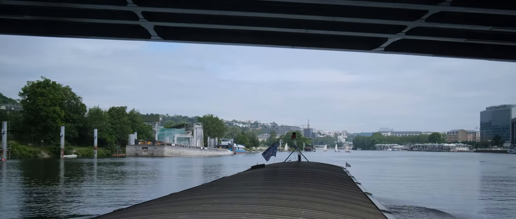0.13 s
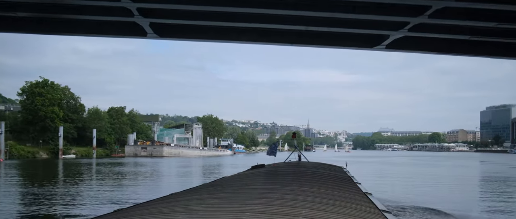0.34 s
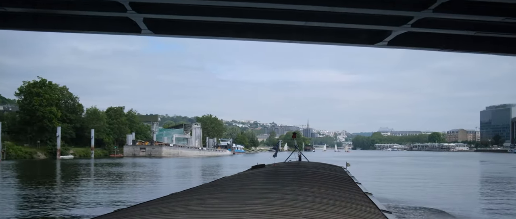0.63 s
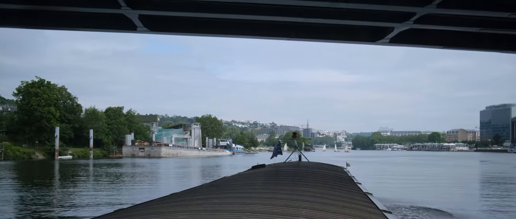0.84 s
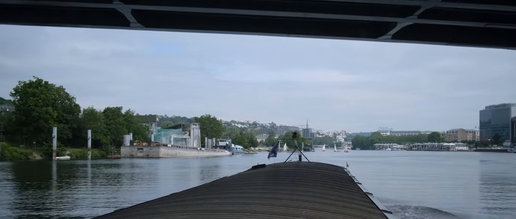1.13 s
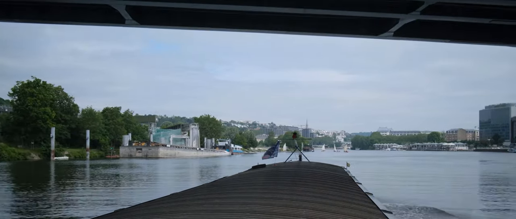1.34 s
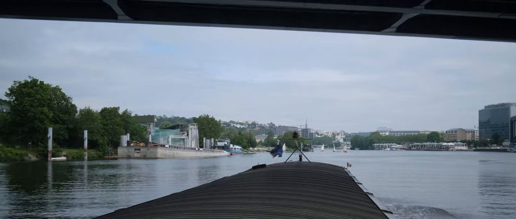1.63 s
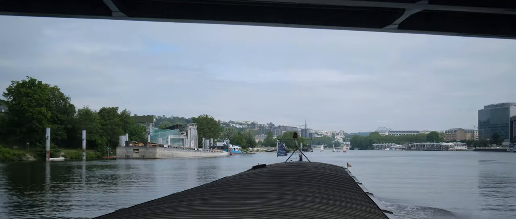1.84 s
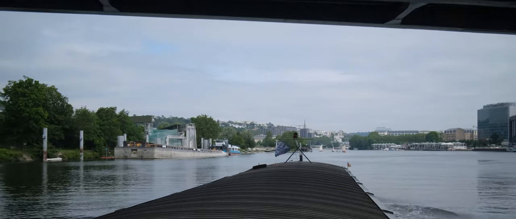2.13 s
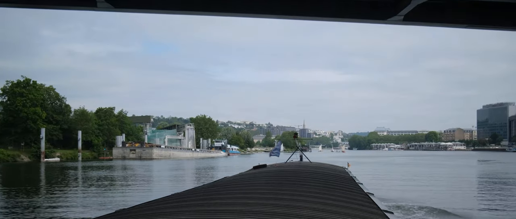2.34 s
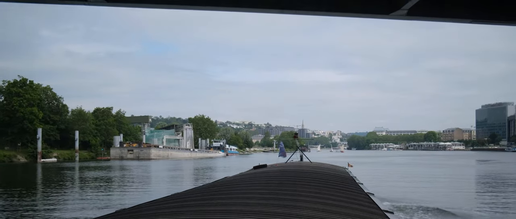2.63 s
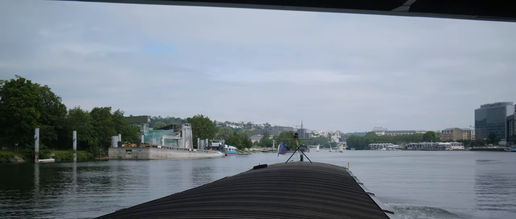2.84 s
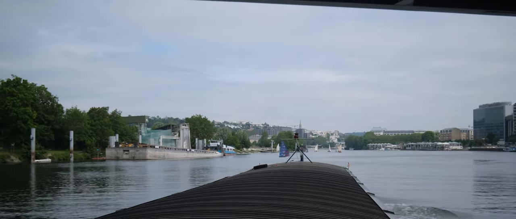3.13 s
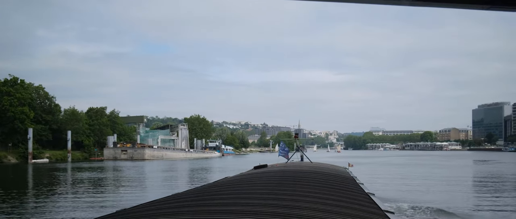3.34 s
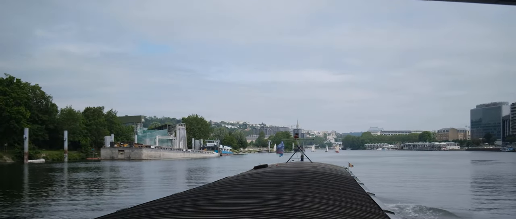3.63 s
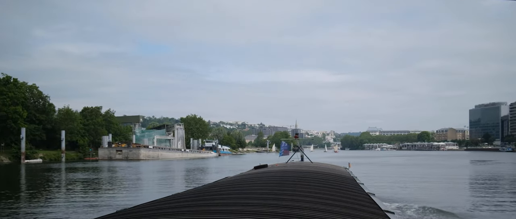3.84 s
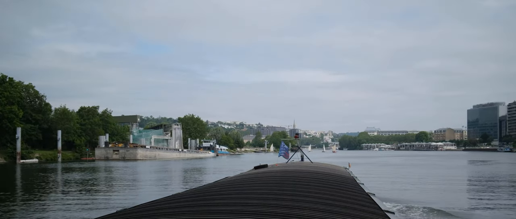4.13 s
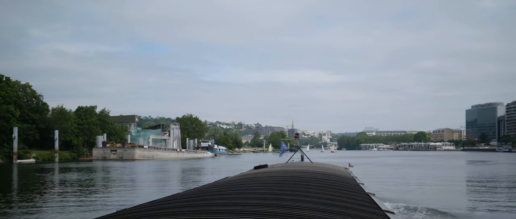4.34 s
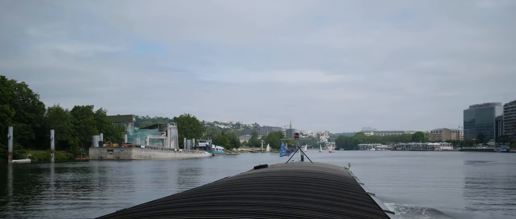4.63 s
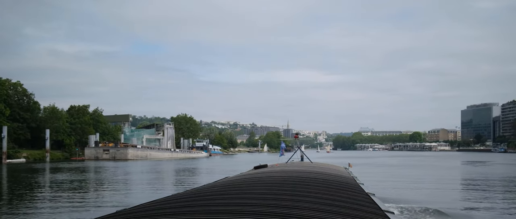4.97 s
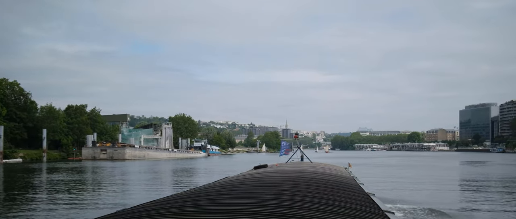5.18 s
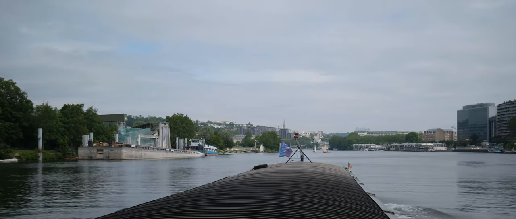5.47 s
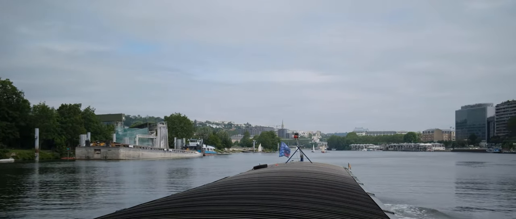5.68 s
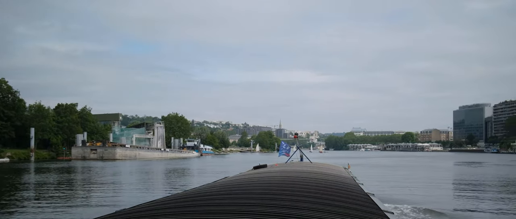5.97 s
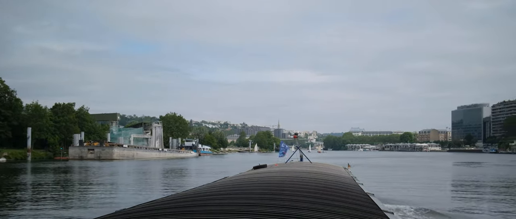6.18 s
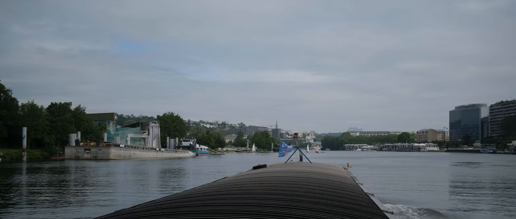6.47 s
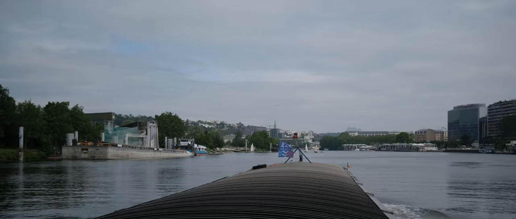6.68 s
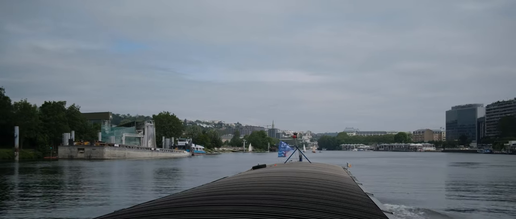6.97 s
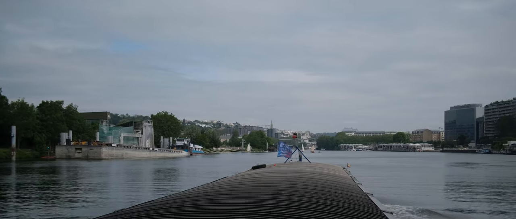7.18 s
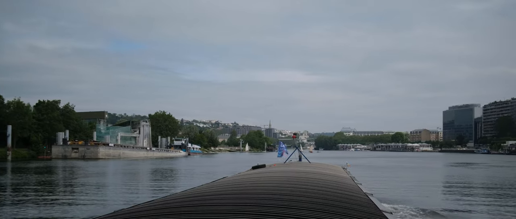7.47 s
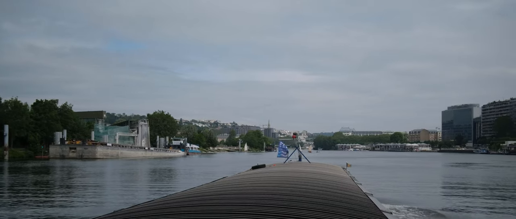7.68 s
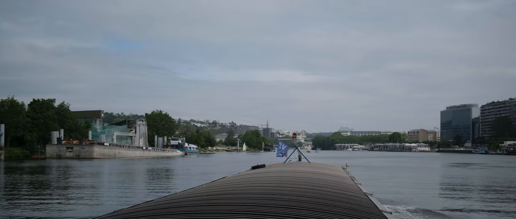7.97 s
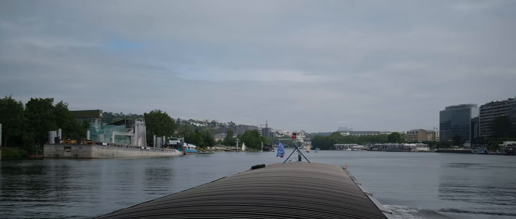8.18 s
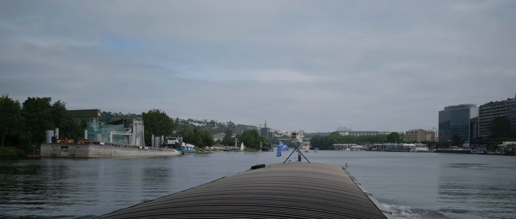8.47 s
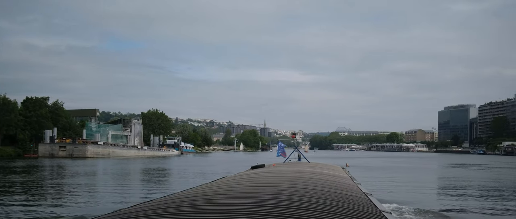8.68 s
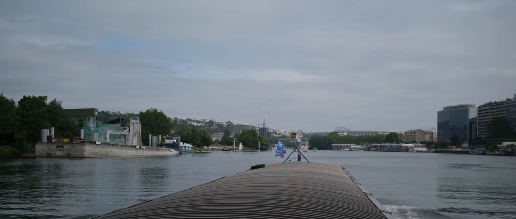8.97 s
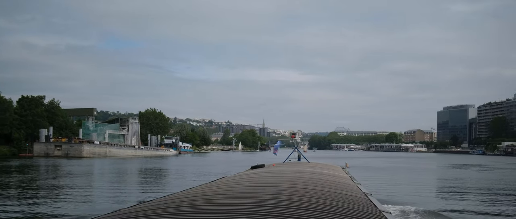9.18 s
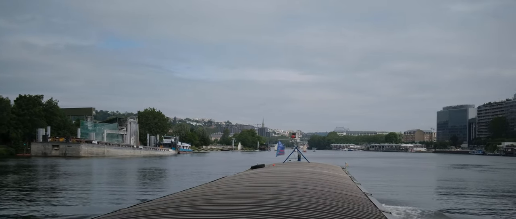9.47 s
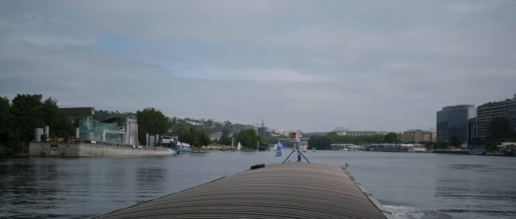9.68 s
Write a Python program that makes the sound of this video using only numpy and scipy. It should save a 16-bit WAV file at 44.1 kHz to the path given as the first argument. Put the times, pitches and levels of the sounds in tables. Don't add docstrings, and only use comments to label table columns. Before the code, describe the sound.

A barge's big diesel runs at constant speed, heard close from the roof outdoors. A dense low drone swells and sinks about every two seconds, with fine mechanical hiss and clatter. Passing under a bridge darkens it briefly, then it opens up. A loose metal part ticks rapidly in spells, and wash splashes softly early and late. The microphone distorts slightly on the deep pulses.

```python
import sys
import numpy as np
from scipy import signal
from scipy.fft import rfft, irfft, next_fast_len
from scipy.io import wavfile
from scipy.ndimage import map_coordinates

SR = 44100
rng = np.random.default_rng(int(sys.argv[2]) if len(sys.argv) > 2 else 0)


def ratio_of_db(decibels):
    return 10 ** (np.asarray(decibels, float) / 20)


def log_audio(samples):
    frames = np.atleast_2d(samples).T
    limited = np.clip(frames, -1, 1)
    pcm = np.round(limited * 32767).astype(np.int16)
    wavfile.write(sys.argv[1], SR, pcm)


N = 432621

# time in seconds, firing rate in Hz, firing order in dB, its octave in dB.
FIRING = [(0.2, 61.08, -12, -12.5), (0.8, 60.98, -13, -12.5), (1.2, 60.74, -13.5, -14.5),
          (1.6, 60.85, -11.5, -14.5), (2.25, 60.76, -11.5, -17.5), (3.0, 61.07, -12, -13.5),
          (3.4, 60.84, -10.5, -17.5), (3.8, 60.58, -11.5, -15.5), (4.4, 60.7, -11, -14),
          (5.2, 60.97, -10.5, -13), (5.6, 60.93, -10, -16), (6.0, 60.97, -10.5, -12.5),
          (6.4, 60.65, -10.5, -17), (6.75, 60.73, -10, -14), (7.3, 60.52, -9.5, -14.5),
          (7.9, 60.72, -10.5, -17.5), (9.1, 60.81, -11, -11), (9.6, 60.72, -10.5, -17.5)]
# time in seconds, open share (0-1).
OPEN_SKY = [(0, .85), (.75, .8), (1.0, .05), (2.5, .08), (3.0, 0.6), (4.05, .5), (4.45, .9), (6.5, 0.98),
            (8.4, 0.93), (9.1, 1.05), (9.81, 1.02)]
BLADE_HZ = 40.0


def unit(x):
    return x / np.sqrt(np.mean(x ** 2) + 1e-20)


def curves(rows):
    s, *cols = np.transpose(rows)
    return [np.interp(np.arange(N) / SR, s, c) for c in cols]


def wobble(knots_per_s):
    coarse = np.arange(0, N + 32, 32)
    knots = rng.standard_normal(int(N * knots_per_s / SR) + 5)
    return np.interp(np.arange(N), coarse, map_coordinates(knots, [coarse * knots_per_s / SR]))


def filtered(x, response):
    m = next_fast_len(N + SR // 2)
    return irfft(rfft(x, m) * response(np.fft.rfftfreq(m, 1 / SR)), m)[..., :N]


def coloured(points):
    hz, db = np.transpose(points)
    gain = lambda f: ratio_of_db(np.interp(np.log(f + 1), np.log(hz), db))
    return unit(filtered(rng.standard_normal(N), gain))


def resonance(f, hz, width_hz):
    return 1j * f * width_hz / (hz * hz - f * f + 1j * f * width_hz)


def load_db(usual_db, db_per_db):
    usual_firing_db = -10.5
    return usual_db + db_per_db * (curves(FIRING)[1] - usual_firing_db)


def open_air_db(shaded_db, gain_db, power, swell_db):
    swells_per_s = 3.1
    return shaded_db + gain_db * np.abs(curves(OPEN_SKY)[0]) ** power + swell_db * wobble(swells_per_s)


def slip(late_s=0.):
    period_s, first_cancel_s = 1.87, 1.38
    return -np.cos(2 * np.pi * (np.arange(N) / SR - first_cancel_s - late_s) / period_s)


def roar():
    # frequency in Hz, density in dB per Hz.
    rumble = [(15, -39.5), (30, -7), (50, 1.5), (70, -7), (120, -5.5), (170, -4.5), (230, -9.5), (400, -17),
              (800, -23.5), (1300, -39.5), (2500, -66.5)]
    return ratio_of_db(load_db(-38, .6) + 14 + 0.21 * wobble(23)) * coloured(rumble)


def splashes():
    # start in seconds, level in dB, t60 in seconds.
    waves = [
        (1.43, -45.5, 3.6),
        (7.41, -46, 2),
        (7.7, -52, .7),
        (4.68, -53, 1.5),
        (8.2, -55, 6),
        (1.26, -56, .4),
    ]
    # frequency in Hz, density in dB per Hz.
    spray = [(600, -30), (1200, -2), (2600, 0), (4500, -7), (7000, -19), (9500, -30), (12000, -45)]
    mist = [(2500, -30), (4000, -3), (6500, 0), (9000, -6), (11000, -25)]  # (Hz, dB per Hz)
    t = np.arange(N) / SR

    def flow(haste):
        total = np.zeros(N)
        for start_s, db, t60_s in waves:
            after_s = np.maximum(t - start_s, 0)
            total += ratio_of_db(db - 60 * haste * after_s / t60_s) * (1 - np.exp(-after_s / .06))
        return total

    lumps = ratio_of_db(1.5 * wobble(45) + 3 * wobble(300))
    body = flow(1) * unit(lumps * coloured(spray))
    return body + ratio_of_db(-9.5) * flow(3.5) * unit(lumps * coloured(mist))


def throb_db():
    share = np.clip(.2 + .06 * np.arange(N) / SR, 0, .9)
    return -27.5 + 10 * np.log10(1 + share ** 2 + 2 * share * slip())


def hull():
    # frequency in Hz, level in dB.
    pump_hums = [(25.6, -47.5), (46.2, -41), (114.8, -30.5), (183.9, -40)]
    t = np.arange(N) / SR
    out = ratio_of_db(throb_db()) * np.cos(2 * np.pi * BLADE_HZ * t - .9 + 0.37 * wobble(1.6))
    for hz, db in pump_hums:
        out += ratio_of_db(db + 0.98 * wobble(1.3)) * np.sin(2 * np.pi * hz * t + 0.4 * wobble(0.97))
    return np.sqrt(2) * out


def looseness(s):
    # start in seconds, end in seconds, share of beats that lift (0-1).
    spells = [(2.6, 2.88, .9), (2.95, 3.12, .5), (4.2, 4.95, .9), (5.2, 6.1, .65), (6.15, 6.72, .95),
              (7.35, 8.8, .8), (9.2, 9.9, .85)]
    idle_share, edge_s = .03, .04
    on = lambda s0: .5 + .5 * np.tanh((s - s0) / edge_s)
    return idle_share + sum(share * (on(start_s) - on(end_s)) for start_s, end_s, share in spells)


def fitting():
    # frequency in Hz, width in Hz, level in dB.
    metal_modes = [(11700, 900, 3), (13500, 900, 1.5), (14900, 1200, 4), (8200, 1500, -3), (3800, 1700, 3)]
    beats_s = (np.arange(int(N / SR * BLADE_HZ)) + .47) / BLADE_HZ
    luck = rng.random((len(beats_s), 3))
    lifted = luck[:, 0] < looseness(beats_s)
    at = ((beats_s + .003 * (luck[:, 1] - .5)) * SR).astype(int)
    ticks = np.zeros(N)
    ticks[at] = lifted * ratio_of_db(-39 + 5 * (luck[:, 2] - .5))
    scrape = np.exp(-np.arange(round(.003 * SR)) / (.0009 * SR))
    ticks = ticks + .2 * np.convolve(ticks, scrape)[:N] * rng.standard_normal(N)

    def ringing(f):
        return sum((-1) ** k * ratio_of_db(db) * resonance(f, hz, width_hz)
                   for k, (hz, width_hz, db) in enumerate(metal_modes))

    return filtered(ticks, ringing)


def clatter(cycle):
    # frequency in Hz, density in dB per Hz.
    hiss_spectrum = [(600, -30), (1200, -2), (2000, -4), (3000, -7), (4500, -11), (6000, -18), (8200, -22),
                     (10500, -32), (12700, -39.5), (15700, -39.5), (15760, -70)]
    # frequency in Hz, width in Hz, level in dB.
    castings = [(1730, 100, -57.5), (3060, 190, -64), (2150, 150, -68), (3950, 60, -76)]
    beat = np.cos(6 * cycle + np.pi - .8)
    wash_db = load_db(-53.5, .8)
    flutter = ratio_of_db(1.6 * beat + 0.35 * wobble(30) + 1.6 * wobble(400))
    hiss = ratio_of_db(wash_db + 3) * unit(flutter * coloured(hiss_spectrum))
    rings = np.zeros(N)
    for hz, width_hz, db in castings:
        burst_db = 3 * beat + .7 * wobble(3) + wobble(30) + 3.5 * wobble(90)
        knocks = ratio_of_db(burst_db) * rng.standard_normal(N)
        rings += ratio_of_db(db) * unit(filtered(knocks, lambda f: resonance(f, hz, width_hz) ** 2))
    return hiss + ratio_of_db(wash_db + 53.5) * rings


def main_orders_db(first_db, octave_db):
    # time in seconds, change in dB.
    lulls = [(1.0, -12), (3.35, -12), (4.0, -12), (4.7, -15), (5.3, -5), (7.15, -11.5), (7.9, -7)]
    lull_half_s, usual_octave_db = 0.092, -14.5
    t = np.arange(N) / SR
    lulls_db = sum(db * np.exp(-.5 * ((t - s) / lull_half_s) ** 2) for s, db in lulls)
    ten_db = open_air_db(-33, gain_db=1, power=0.1, swell_db=1.7) + 4 * slip(late_s=0.54)
    sixteen_db = open_air_db(-31, gain_db=3, power=0.8, swell_db=2.5) + 3.5 * slip(late_s=0.077)
    eighteen_db = open_air_db(-34.5, gain_db=11.5, power=3.5, swell_db=1.18)
    eighteen_db = eighteen_db + 0.55 * (octave_db - usual_octave_db) + lulls_db
    twenty_four_db = open_air_db(-40, gain_db=8, power=.6, swell_db=2)
    return [(6, first_db), (10, ten_db), (12, octave_db), (16, sixteen_db),
            (18, eighteen_db), (24, twenty_four_db)]


def exhaust(cycle, first_db, octave_db):
    # order, level in dB.
    weak_orders = [(2, -43.5), (4, -48.5), (5, -36.5), (8, -46.5), (9, -44.5), (11, -41), (13, -32.5),
                   (14, -50.5), (22, -48), (30, -39), (34, -41), (36, -43), (42, -43.5), (78, -53),
                   (84, -57.5)]
    silencer_hz, silencer_width_hz = 152, 8
    orders = main_orders_db(first_db, octave_db)
    sky_db = 4 * (curves(OPEN_SKY)[0] - .6)
    for k, db in weak_orders:
        orders.append((k, db + 2 * wobble(4) + (k > 20) * sky_db))
    uneven = cycle + .008 * wobble(8)
    pulse = np.exp(7 * (np.cos(6 * uneven + .1) - 1)) - .155
    out = -.18 * ratio_of_db(2.5 * wobble(25)) * pulse
    for k, db in orders:
        hz = k * 60.8 / 6
        lag = np.arctan2(hz * silencer_width_hz, silencer_hz ** 2 - hz * hz)
        phase = k * uneven - lag + .008 * k * wobble(6)
        out -= np.sqrt(2) * ratio_of_db(db + 0.45 * wobble(14)) * np.cos(phase)
    return out


def scene():
    firing_hz, first_db, octave_db = curves(FIRING)
    cycle = 2 * np.pi * np.cumsum(firing_hz / 6) / SR
    background = roar() + splashes() + hull() + fitting()
    return (background + clatter(cycle) + exhaust(cycle, first_db, octave_db))[None]


def band_limit(x):
    return signal.sosfilt(signal.butter(12, 15820, fs=SR, output="sos"), x)


def record(dry):
    bottom, catch_s, crest, coupling_hz = .53, .0004, .7, 10.
    excess = np.minimum(dry + bottom, 0)
    n = np.arange(N)
    last_free = np.maximum.accumulate(np.where(excess < 0, -SR, n), axis=1)
    since_s = (n - last_free) / SR
    overshoot = .085 * np.tanh(excess * np.exp(-.5 * (since_s / catch_s) ** 2) / .075)
    held = dry - excess + overshoot
    held = held / (1 + (np.maximum(held, 0) / crest) ** 6) ** (1 / 6)
    coupled = signal.lfilter([1, -1], [1, -np.exp(-2 * np.pi * coupling_hz / SR)], held)
    return band_limit(coupled)


dry = scene()
out = record(dry)
log_audio(out)
```